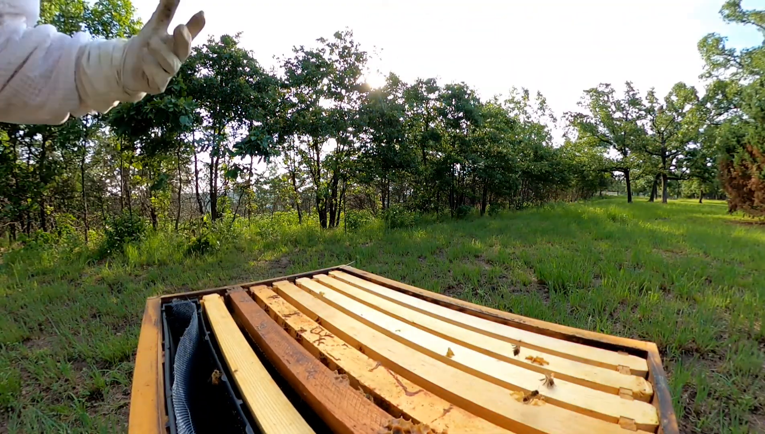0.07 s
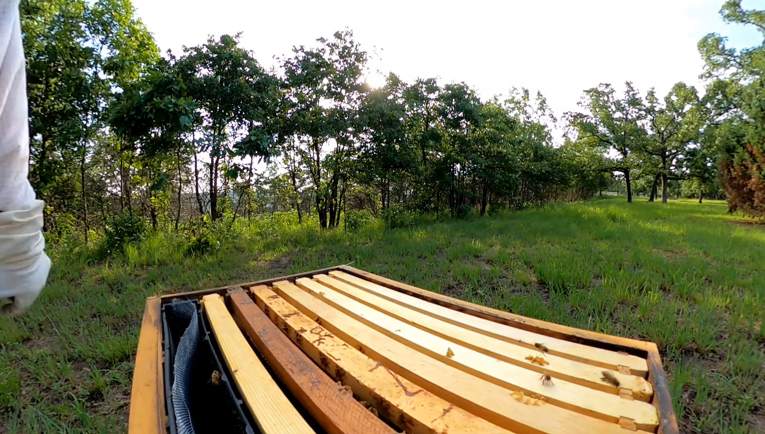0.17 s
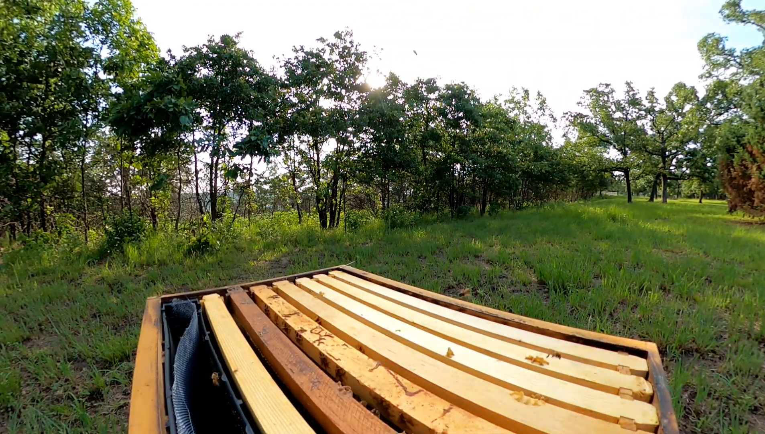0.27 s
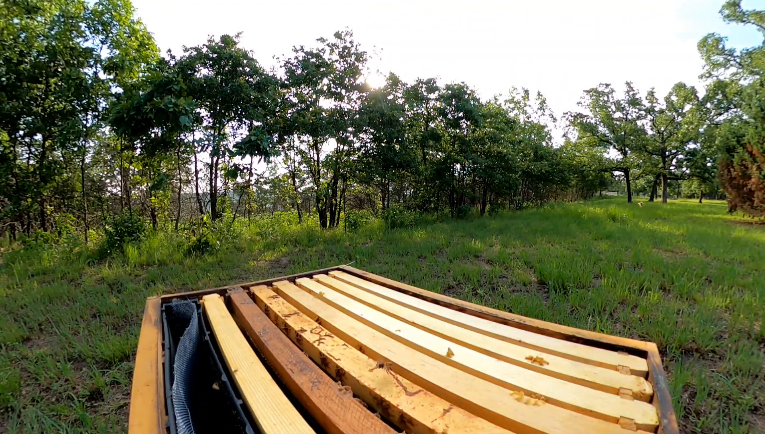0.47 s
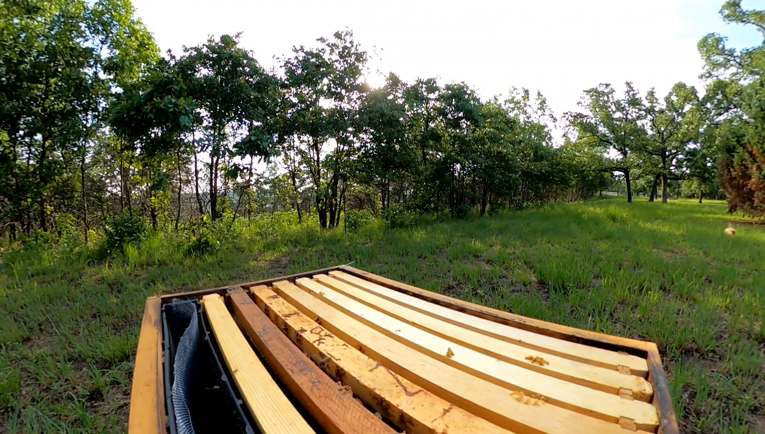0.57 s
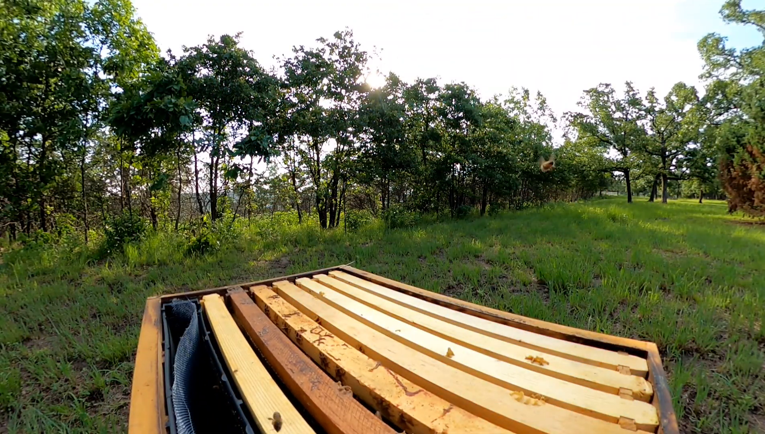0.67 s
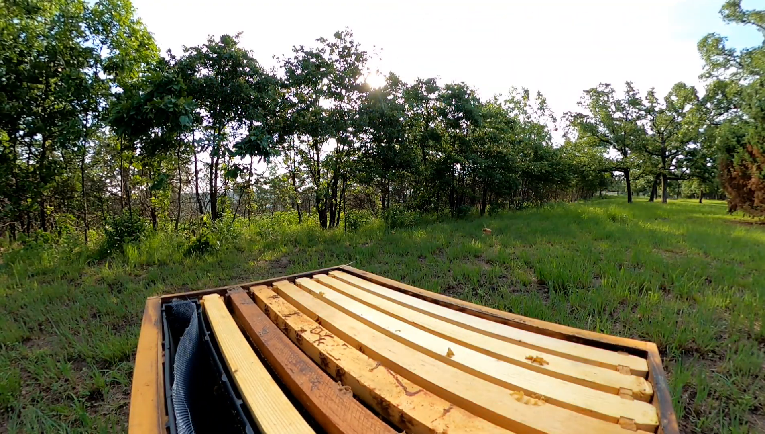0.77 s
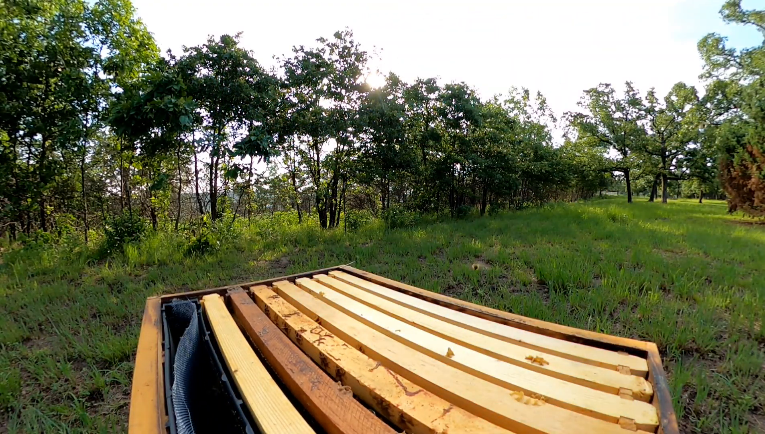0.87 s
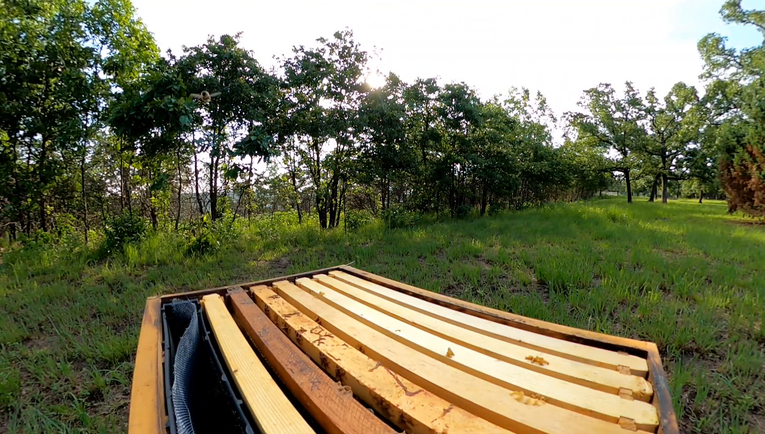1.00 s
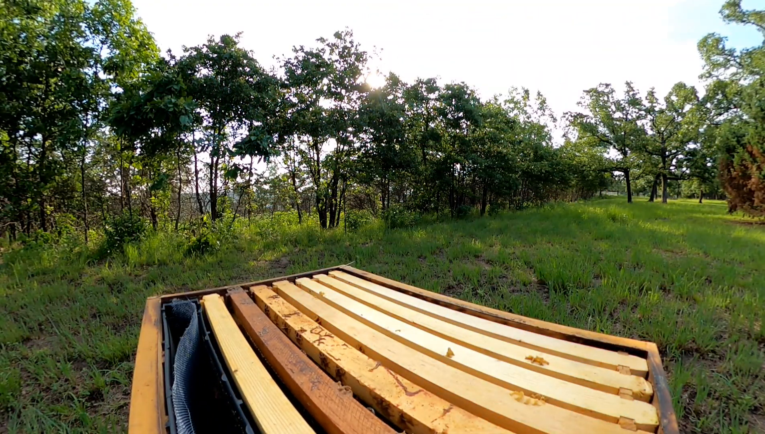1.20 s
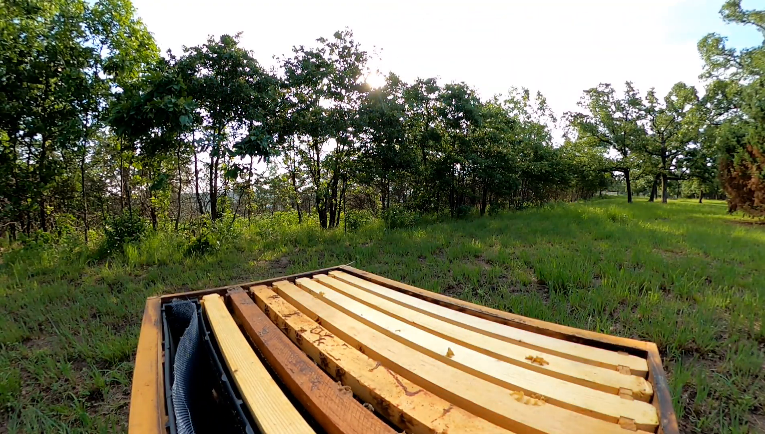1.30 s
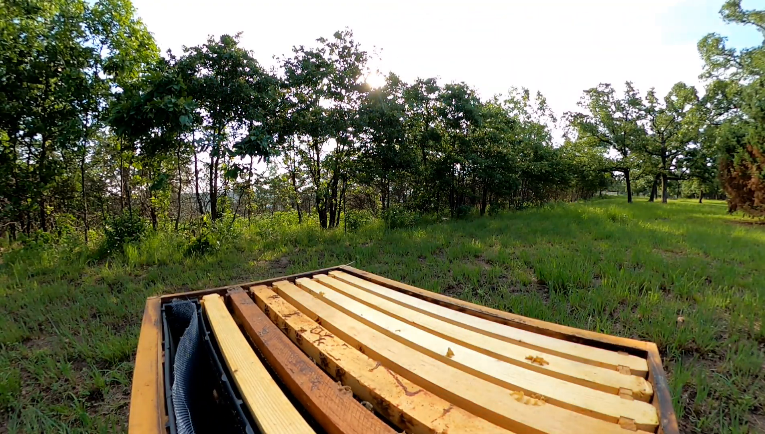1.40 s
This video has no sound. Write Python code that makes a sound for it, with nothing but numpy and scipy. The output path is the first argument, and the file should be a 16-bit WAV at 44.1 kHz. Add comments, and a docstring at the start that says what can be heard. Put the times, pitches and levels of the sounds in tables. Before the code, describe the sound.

Steady low buzzing of many bees at an open hive, with a quick cluster of wooden knocks

```python
"""In a meadow, bees hum over an open wooden hive, close to a small stereo camera standing on the box.
Many unsteady harmonic wingbeats overlap with the noise-like blur of bees inside and a hiss of wings.
One bee is nearer at first, a slower-beating one leaves, and another flies by later. A breeze buffets
the ports as shaped low noise. A tool thuds and knocks on the box, whose wooden modes ring after each
smooth push, and it ticks in short swells of noise coloured by the ringing camera shell."""
import sys
import numpy as np
from scipy import signal
from scipy.fft import rfft, irfft, next_fast_len
from scipy.io import wavfile
from scipy.ndimage import uniform_filter1d, map_coordinates

SR = 44100
rng = np.random.default_rng(int(sys.argv[2]) if len(sys.argv) > 2 else 0)


def output_pcm(signal):
    """Save a mono or channel-first signal as 16-bit PCM at the path in sys.argv[1].

    Samples are clipped to [-1, 1] before scaling.
    """
    pcm = np.clip(np.atleast_2d(signal).T, -1, 1) * 32767
    wavfile.write(sys.argv[1], SR, np.round(pcm).astype(np.int16))


def gain_from_decibels(decibels):
    """Convert decibel values to linear amplitude factors."""
    exponent = np.asarray(decibels, float) / 20
    return 10 ** exponent


N = 63945  # length in samples


def unit(x):
    """Normalization: scale to an rms of 1."""
    return x / np.sqrt(np.mean(x ** 2) + 1e-20)


def along(points, hz):
    """Logarithmic frequency: interpolate (Hz, dB) points on a log axis, -120 dB below the first."""
    point_hz, db = np.transpose(points)
    return np.interp(np.log(hz + 1), np.log(point_hz + 1), db, left=-120)


def curves(rows):
    """Envelopes: one value per sample for each column after the time."""
    seconds, *columns = np.transpose(rows)
    return [np.interp(np.arange(N) / SR, seconds, column) for column in columns]


def wobble(rate):
    """Slow random modulation: a smooth curve through normal random knots, rate of them a second."""
    knots = rng.standard_normal(400)
    return map_coordinates(knots, [np.arange(N) * min(rate, 250) / SR])


def filtered(x, response):
    """Linear filtering: the spectrum of x times a response of frequency."""
    size = next_fast_len(x.shape[-1] + 8192)
    spectrum = rfft(x, size) * response(np.fft.rfftfreq(size, 1 / SR))
    return irfft(spectrum, size)[..., :x.shape[-1]]


def rush(spectrum, patchy_db):
    """Shaped turbulence-like noise: two independent noises sharing time-frequency patches of gain."""
    cells = signal.stft(rng.standard_normal((2, N + 512)), nperseg=512)[2]
    field = rng.standard_normal(cells.shape[1:])
    field = uniform_filter1d(field, size=8, axis=0)
    field = uniform_filter1d(field, size=5, axis=1)
    pair = signal.istft(cells * gain_from_decibels(patchy_db * unit(field)), nperseg=512)[1][:, :N]
    return unit(filtered(pair, lambda hz: gain_from_decibels(along(spectrum, hz))))


def wings(beat_hz, tones):
    """Harmonic series: every partial is a multiple of one unsteady wingbeat."""
    turn = 2 * np.pi * (np.cumsum(beat_hz) / SR + rng.random())
    return sum(gain_from_decibels(db) * np.sin(k * turn + k * k) for k, db in tones)


# Spectral envelope of the flying bees. Each row: frequency in Hz, harmonic gain in dB.
HUM_SPECTRUM = [(100, -36), (160, -0.5), (230, -3.5), (310, 5), (430, -2.5), (550, -5), (650, -15),
                (800, -15.5), (1250, -6.5), (1800, -19), (3000, -26.5), (6000, -34)]
BEES = 14
BEAT_HZ, BEAT_SPREAD = 226, 0.352  # middle wingbeat, full range between bees as a log ratio
DRIFT, DRIFT_RATE = 0.035, 7  # slow pitch wander as a log ratio, knots a second
JITTER, JITTER_RATE = 0.03, 90  # fast pitch wander as a log ratio, knots a second
FLIT_DB, FLIT_RATE = 4, 14.14  # each bee comes and goes: depth in dB, knots a second


def flying_bees():
    """Superposition: detuned harmonic wingbeats overlap, alternate bees on opposite sides."""
    pair = np.zeros((2, N))
    for k in range(BEES):
        place = (k + rng.random()) / BEES - 0.5
        wander = DRIFT * wobble(DRIFT_RATE) + JITTER * wobble(JITTER_RATE)
        beat_hz = BEAT_HZ * np.exp(BEAT_SPREAD * place + wander)
        tone = wings(beat_hz, [(j, 0) for j in range(1, 20)])
        pair += gain_from_decibels(FLIT_DB * wobble(FLIT_RATE)) * tone * [[1], [(-1) ** k]]
    return unit(filtered(pair, lambda hz: gain_from_decibels(along(HUM_SPECTRUM, hz))))


# Bees inside the box. Each row: frequency in Hz, relative spectral density in dB per Hz.
BLUR_SPECTRUM = [(76, -30), (130, -12.5), (157, -4), (247, -12), (301, -5), (448, 1), (539, -5), (633, -13),
                 (772, -10.5), (2500, -38.5), (3250, -41), (5500, -120)]


def inside_blur():
    """Incoherent summation: the bees inside merge into band-shaped noise."""
    return rush(BLUR_SPECTRUM, patchy_db=1.0)


# Air noise of the wings. Each row: frequency in Hz, relative spectral density in dB per Hz.
HISS_SPECTRUM = [(700, -17), (1500, 1.5), (3000, -8.5), (6000, -16), (8300, -20.5), (10500, -31),
                 (12500, -30.5), (13800, -49), (14500, -48), (15600, -65)]


def wing_hiss():
    """Broadband air noise: the wings hiss as slightly patchy shaped noise."""
    return rush(HISS_SPECTRUM, patchy_db=0.4)


# Swarm levels. Each row: time in seconds, hum level in dB, wing hiss level in dB before an 8 dB lift.
SWARM_LEVELS = [(0, -41, -58), (.1, -41, -59.5), (.2, -44, -57), (.3, -41.5, -58.5), (.39, -45.5, -63.5),
                (.47, -45.5, -67.5), (.54, -48, -69.5), (.58, -44.5, -63), (.63, -46, -67),
                (.695, -45.5, -69.5), (.72, -44.5, -62), (.81, -45.5, -63), (.85, -46, -68.5),
                (.94, -47.5, -68.5), (.99, -49, -66), (1.04, -49.5, -70), (1.14, -47, -65.5),
                (1.24, -47.5, -68), (1.35, -47.5, -66.5), (1.45, -47.5, -68.5)]
# Stereo difference by pitch. Each row: frequency in Hz, side gain in dB before the width is added.
SIDE_SPECTRUM = [(60, -19), (110, -24), (200, -40), (380, -45), (700, -70), (1290, -22), (2380, -20),
                 (4400, -17.5), (8120, -14), (15000, -27)]
# The swarm's stereo width, wide at first and narrowing to nearly central.
# Each row: time in seconds, width added to the side in dB.
WIDTH = [(0, 12), (.2, 12.5), (.4, 10.5), (.7, 4), (1.45, -35)]


def swarm():
    """Sum and difference stereo: hum, blur and hiss as mid and side, the side shaped by pitch and time."""
    hum_db, hiss_db = curves(SWARM_LEVELS)
    hum = gain_from_decibels(-1.5) * flying_bees() + inside_blur()
    mid, side = gain_from_decibels(hum_db) * hum + gain_from_decibels(hiss_db + 8) * wing_hiss()
    side = filtered(side, lambda hz: gain_from_decibels(along([(1, -20)] + SIDE_SPECTRUM, hz)))
    return np.array([mid, gain_from_decibels(curves(WIDTH)[0]) * side])


WAVER, WAVER_RATE = 0.008, 50  # pitch waver as a log ratio, knots a second
WAVER_DB, WAVER_DB_RATE = 2, 39.75  # level waver in dB, knots a second


def bee(path, tones):
    """Frequency and amplitude modulation: one bee close enough to follow, along its path."""
    beat_hz, level_db = curves(path)
    tone = wings(beat_hz * np.exp(WAVER * wobble(WAVER_RATE)), tones)
    return gain_from_decibels(level_db + WAVER_DB * wobble(WAVER_DB_RATE)) * tone


# Nearest bee. Each row: time in seconds, wingbeat in Hz, level in dB.
NEAR_PATH = [(0, 212.8, -45), (.05, 213.8, -37.5), (.09, 209.6, -43.5), (.16, 210.1, -37.5),
             (.22, 203.4, -34), (.35, 213, -49), (.45, 214, -41.5), (.51, 200.4, -56), (.6, 226, -55),
             (.7, 208.5, -59.5), (.82, 220, -58), (.86, 210.1, -52), (.91, 218.2, -51.5), (1.0, 221, -48.5),
             (1.08, 214.9, -61), (1.14, 201.2, -43), (1.19, 228, -53.5), (1.29, 222.9, -53),
             (1.34, 215.3, -62.5), (1.45, 221.4, -51)]
# Its partials. Each row: multiple of the wingbeat, relative level in dB.
NEAR_PARTIALS = [(1, -12), (2, 2), (3, -33), (4, -38), (5, -17), (6, -14.5)]


def nearest_bee():
    """Harmonic series: the nearest bee, strongest in its second partial."""
    return bee(NEAR_PATH, NEAR_PARTIALS)


# Slower-beating bee. Each row: time in seconds, wingbeat in Hz, level in dB.
SLOW_PATH = [(0, 170.1, -42), (.07, 168, -43), (.13, 178.7, -44), (.19, 172, -35), (.26, 172, -55),
             (.32, 172, -83)]
# Its partials. Each row: multiple of the wingbeat, relative level in dB.
SLOW_PARTIALS = [(1, -5), (2, -2.5), (3, -8), (4, -11)]


def leaving_bee():
    """Amplitude envelope: a slower-beating bee swells, then fades as it leaves."""
    return bee(SLOW_PATH, SLOW_PARTIALS)


# Breeze on the ports. Each row: frequency in Hz, relative spectral density in dB per Hz.
AIR_SPECTRUM = [(18, -4), (30, -8.5), (60, -8), (110, -10), (160, -45), (250, -61)]
# Gusts. Each row: time in seconds, level in dB.
GUST_LEVELS = [(0, -53), (.2, -59), (.4, -48), (.45, -46.5), (.53, -61), (.6, -50), (.67, -58),
               (.75, -57.5), (.8, -62), (.98, -60), (1.07, -54.5), (1.1, -53), (1.2, -62), (1.34, -53.5),
               (1.45, -66)]


def breeze():
    """Wind buffeting: low noise, mostly common to both ports, so the side is 14 dB weaker."""
    level_db = curves(GUST_LEVELS)[0] + 1.4 * wobble(9.14)
    return gain_from_decibels(level_db) * rush(AIR_SPECTRUM, patchy_db=2.4) * gain_from_decibels([[0], [-14]])


# Modes of the wooden box. Each row: frequency in Hz, level in dB, 60 dB decay time in seconds,
# side level relative to mid in dB.
BOX_MODES = [(58.1, -10.5, 0.22, -2.5), (75, -12.5, 0.12, -5), (138.8, -5.5, .17, -1.5),
             (172, -3.5, 0.1, -12), (236.2, -7.5, .11, -26), (369, -1, 0.051, -5.5), (438, -6, 0.11, -14),
             (557, -2.5, 0.063, -21), (802, -24.5, 0.16, -14), (871.4, -11.5, 0.11, -21),
             (955.5, -3, 0.065, -20), (1173, 0, 0.015, 2.5), (1300, 2, 0.025, -12), (1490, -18, 0.029, -5),
             (1930, -9, 0.09, -6)]
# Tool blows. Each row: time in seconds (the push peaks one contact time later), level in dB,
# contact time in seconds, lean to the left as a factor on the side.
TOOL_BLOWS = [(0.187, -19, 0.0083, 1.1), (0.1928, -27, 0.00069, 0.11), (0.199, -24.5, 0.0018, .5),
              (.2195, -57, 0.0052, .5), (0.2249, -9, 0.0028, 0.54), (.232, -17, 0.0026, -1.3),
              (0.2465, -16, 0.000708, 0.62), (.2490, -11.5, 0.00088, -1.17), (.2535, -8, 0.00133, 0.37),
              (.2560, -8, 0.001987, 0.39), (0.263, -14, 0.0021, 0.55), (0.284, -29, 0.0048, 0.97),
              (.302, -26, 0.0041, 1.1), (0.333, -24.5, 0.0053, 0.23)]
BASS_FLOOR_HZ = 40


def without_sub_bass(hz):
    """High-pass filtering: a fifth-order high-pass keeps the knocks free of sub-bass."""
    second_order = -hz ** 2 / (BASS_FLOOR_HZ ** 2 - hz ** 2 + 1.2j * hz * BASS_FLOOR_HZ)
    first_order = 1j * hz / (BASS_FLOOR_HZ + 1j * hz)
    return second_order ** 2 * first_order


def box_ring(t, wide):
    """Modal decay: a sum of damped sines, for mid (wide 0) or side (wide 1)."""
    ring = np.zeros(len(t))
    for k, (hz, db, t60, side_db) in enumerate(BOX_MODES):
        decay = gain_from_decibels(db + wide * side_db - 60 * t / t60)
        ring += decay * np.sin(2 * np.pi * hz * t + wide * k)
    return ring


def knocks():
    """Modal excitation: each smooth push rings the box, and short pushes reach the high modes."""
    out = np.zeros((2, N + SR))
    t = np.arange(SR // 3) / SR
    ring = np.array([box_ring(t, wide) for wide in (0, 1)])
    for s, db, contact, lean in TOOL_BLOWS:
        push = np.exp(-0.5 * ((t[:1500] - 2 * contact) / (contact / 4)) ** 2)
        blow = signal.fftconvolve(ring, push[None] / push.sum(), axes=1) * [[1], [lean]]
        start = round((s - contact) * SR)
        out[:, start:start + blow.shape[1]] += gain_from_decibels(db) * blow
    return filtered(out[:, :N], without_sub_bass)


# Small dry contacts. Each row: start in seconds, level in dB, centre frequency in Hz,
# 60 dB decay time in seconds, lean to the left as a factor on the side.
TOOL_TICKS = [(0.1919, -21, 1250, 0.014, 0.18), (.2475, -23, 1770, 0.023, 0.19),
              (0.251, -20.5, 4700, 0.006, -0.55), (.2535, -28, 2030, 0.02, 0.2),
              (.302, -50, 4000, 0.014, .4), (.443, -58, 6860, .014, .1), (0.5662, -39, 3000, 0.016, 0.37),
              (0.57, -41, 6200, 0.0047, 0.015), (.709, -48, 2950, 0.021, .1), (.992, -57, 7000, .008, .1)]
TICK_RISE_S, TICK_OCTAVES = 0.00069, 0.86  # swell time, half-width of the noise band
TOP_HZ = 14400  # the microphone fades above
SHELL_HZ, SHELL_WIDTH_HZ, SHELL_GAIN = 11900, 500, 1.5  # camera shell: centre, spread, added gain
SHELL_SIDE = 0.3  # the shell ring is nearly central: added gain at which the side is halved


def shell(hz):
    """Resonance: the added gain where the camera shell rings."""
    return SHELL_GAIN * np.exp(-0.5 * ((hz - SHELL_HZ) / SHELL_WIDTH_HZ) ** 2)


def ticks():
    """Transient noise: brief swells around a centre pitch, lifted where the camera shell rings."""
    out = np.zeros((2, N + SR))
    t = np.arange(2000) / SR
    swell = 1 - np.exp(-(t / TICK_RISE_S) ** 2)
    for s, db, centre_hz, t60, lean in TOOL_TICKS:
        def colour(hz):
            band = 1 / (1 + (np.log2((hz + 1) / centre_hz) / TICK_OCTAVES) ** 4)
            return band / (1 + (hz / TOP_HZ) ** 20) * (1 + shell(hz))
        mid, other = filtered(rng.standard_normal((2, len(t))), colour)
        side = filtered(lean * (mid + other), lambda hz: 1 / (1 + shell(hz) / SHELL_SIDE))
        envelope = gain_from_decibels(db - 60 * t / t60) * swell
        start = round(s * SR)
        out[:, start:start + len(t)] += np.array([mid, side]) / mid.std() * envelope
    return out[:, :N]


# A bee flies by. Each row: time in seconds, wingbeat in Hz, level in dB.
PASSING_PATH = [(.5, 225, -68), (.58, 226, -44), (.64, 235, -60), (.69, 275, -48), (.75, 291, -49),
                (.79, 262, -43.5), (0.818, 246, -38), (.87, 250, -74), (.95, 250, -51.5), (1.03, 255, -60),
                (1.199, 255, -65.5), (1.34, 265, -48), (1.45, 265, -61.5)]
# Its partials. Each row: multiple of the wingbeat, relative level in dB.
PASSING_PARTIALS = [(1, 0.5), (2, -0.5), (3, -18), (4, -15), (5, -12), (6, -14)]


def passing_bee():
    """Amplitude envelope: a bee flies by, rising from near silence at the start."""
    return bee([(0, 225, -90)] + PASSING_PATH, PASSING_PARTIALS)


def scene():
    """Sum and difference matrix: everything as mid and side, turned to left and right."""
    mid, side = swarm() + breeze() + knocks() + ticks()
    mid = mid + nearest_bee() + leaving_bee() + passing_bee()  # these bees are central
    return np.array([mid + side, mid - side])


def low_pass(x):
    """Removes everything above the highest recorded frequency."""
    return signal.sosfilt(signal.butter(12, 15640, fs=SR, output="sos"), x)


def record(dry):
    """Signal chain: the finished stereo mix passes through the camera."""
    return low_pass(dry)


dry = scene()
out = record(dry)
output_pcm(out)
```